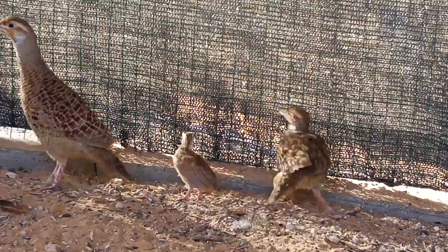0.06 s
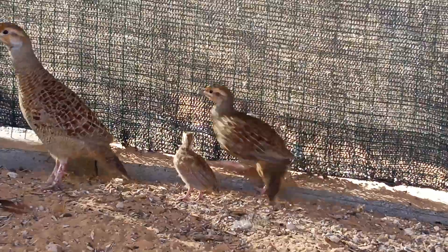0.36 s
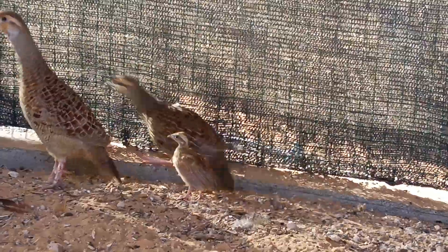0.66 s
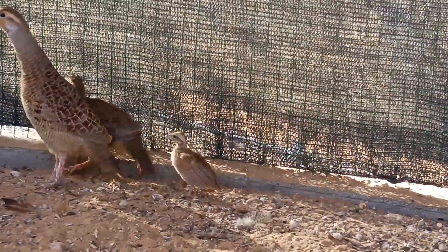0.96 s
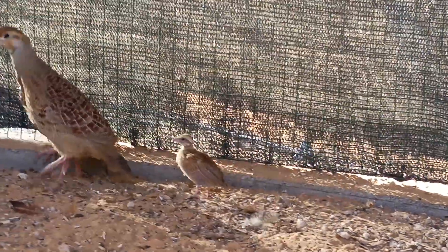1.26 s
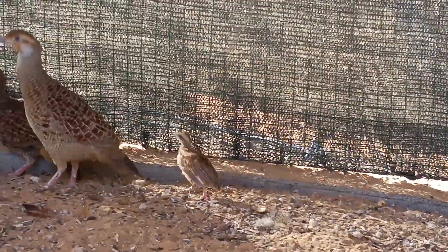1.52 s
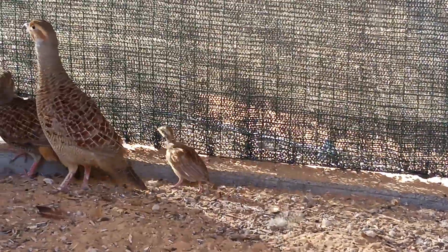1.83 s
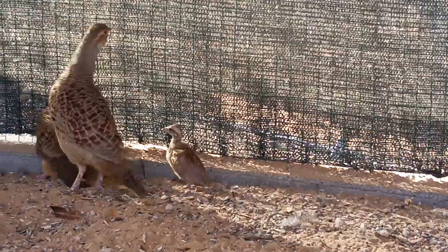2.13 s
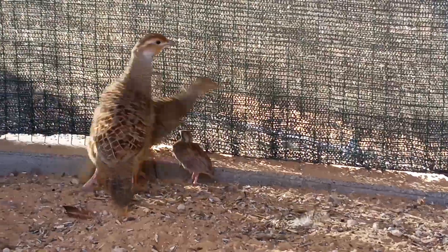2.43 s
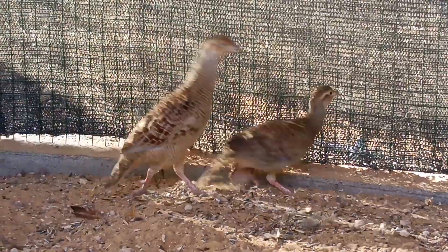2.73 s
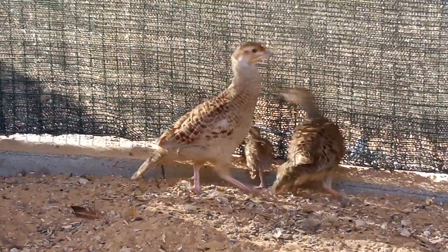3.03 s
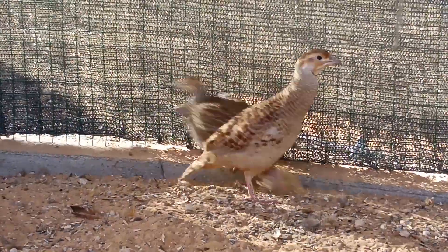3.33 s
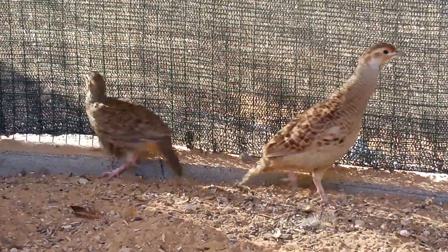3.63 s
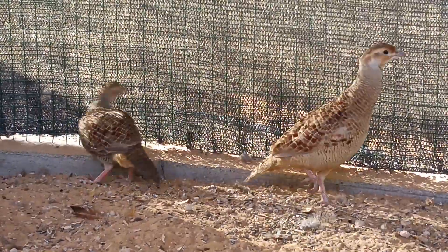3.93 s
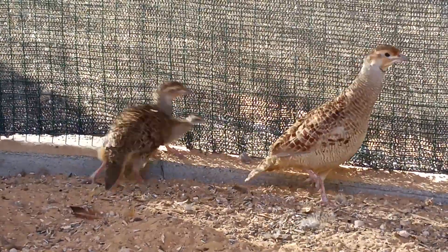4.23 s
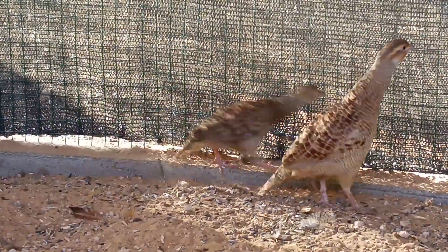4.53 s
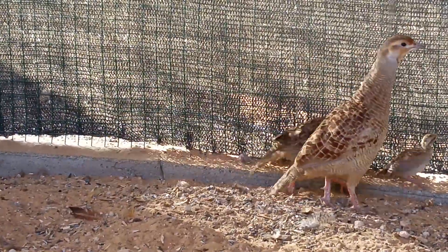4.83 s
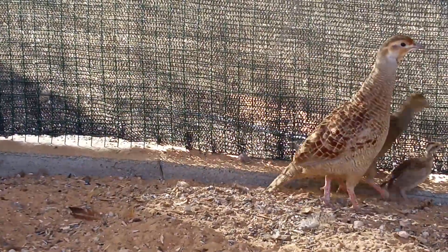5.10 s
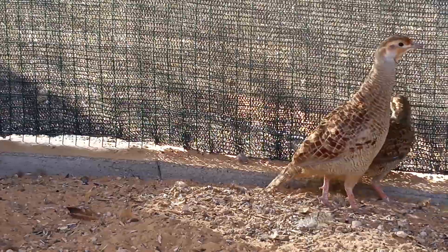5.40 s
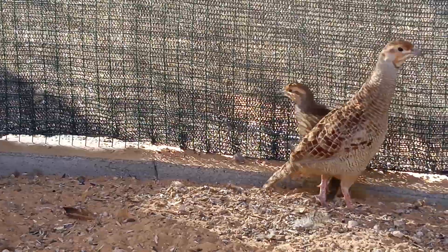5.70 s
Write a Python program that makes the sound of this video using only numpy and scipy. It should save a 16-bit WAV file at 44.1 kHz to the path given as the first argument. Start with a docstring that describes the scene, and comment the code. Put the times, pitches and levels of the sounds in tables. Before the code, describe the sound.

Young game birds peep softly close by while an adult cuts in four times with a loud, sharp chip that trails into a faint rattle. Hoarse little mutters and small gritty footsteps fill the gaps, and only faint peeps and steps follow the last call. Behind them in the open-air pen are a few very faint distant calls early on, a low hum that swells and fades, and a thin hiss.

```python
"""A netted pen, grey francolins walking on gravel. An adult gives four sharp calls, each a rising squeak,
a loud chip and a soft rasp fluttering through throat resonances; young birds peep, wheeze and chatter
in between, among soft low notes. Feet crack the grit, and ground and kerb echo briefly. Behind are
faint distant calls, a low hum that swells and fades, and quiet air."""
import sys
import numpy as np
from scipy import signal
from scipy.fft import rfft, irfft, next_fast_len
from scipy.io import wavfile

SR = 44100
rng = np.random.default_rng(int(sys.argv[2]) if len(sys.argv) > 2 else 0)


def store_wav(level_fs):
    """Save 16-bit WAV to argv[1]."""
    pcm = np.round(np.clip(np.atleast_2d(level_fs), -1, 1) * 32767)
    wavfile.write(sys.argv[1], SR, pcm.T.astype(np.int16))


N = 258323
TIME_S = np.arange(N) / SR
EDGE_HZ = 15900
PURE_OCTAVE_DB = -26  # re the fundamental
# Spectrum of hoarse breath. Each row: frequency in Hz, relative level in dB.
BREATH_SPECTRUM = [(1200, -48.5), (2000, -17.5), (3100, -2), (4200, -5), (5100, 0.5), (6300, -5),
                   (7500, -23), (12000, -32.5), (16000, -42)]


def adult(squeak_lead_s=.026, rattle_delay_s=.03, rattle_s=0.2781, left_db=3):
    """Each call: a squeak swells and sweeps up, breaks into a chip and trails off as a rattle."""
    # Each row: time in seconds, chip gain in dB, pitch in Hz, chip tone length in seconds,
    # third-harmonic gain in dB, rattle gain in dB.
    calls = [(.779, -13.5, 1770, 0.01702, -11, -42.5), (2.198, -14.5, 1702, 0.011, -19, -45),
             (3.184, -14.5, 1679, 0.014, -10, -43.5), (4.4626, -14, 1713, 0.01208, -13, -47)]
    out = np.zeros(N)
    for s, db, hz, length_s, third_db, rattle_db in calls:
        squeak = whistle(length_s=0.024, db=-39.5, path_hz=[1700, 2750, 3700], octave_db=0, rough=.55)
        add(out, s - squeak_lead_s, squeak * np.linspace(0, 2, len(squeak)))
        add(out, s - .004, chip(length_s, db, hz, third_db))
        add(out, s + rattle_delay_s, rattle(rattle_s, rattle_db))
    return panned(out, left_db)


def chip(length_s, db, hz, third_db, bend=.15, jitter=.028, puff_db=-3.5, puff_stretch=2.3, lead_s=.004):
    """A few dozen hard cycles whose pitch leaps and drops, inside a longer harsh puff."""
    # Each entry: relative level of a harmonic in dB, from the fundamental up.
    harmonics_db = [-10, -2, 0, -28.5, -34, -31, -29, -40.5]
    # Each row: frequency in Hz, relative level in dB.
    puff_spectrum = [(300, -47.5), (650, -34.5), (950, -28.5), (1650, 1), (2300, -4), (3100, 6.5),
                     (4200, -1), (5200, -2), (6200, -13.5), (8000, -26), (12000, -20), (16000, -33.5)]
    u, puff_u = progress(length_s), progress(length_s * puff_stretch)
    phase = phase_of(hz * (1 + bend * (arch(u, .6) - .94) + jitter * wobble(len(u), 700)))
    tone = sum(gain_of(level_db + third_db * (k == 3)) * np.sin(k * phase)
               for k, level_db in enumerate(harmonics_db, 1))
    out = gain_of(puff_db) * noise(len(puff_u), puff_spectrum) * arch(puff_u ** 0.7, 3.9)
    add(out, lead_s, evened(tone * arch(u, 1.6)))
    return gain_of(db) * out


def rattle(length_s, db, beat_hz=52, sag=.12, drift=0.04, swell_db=1.5, fall_db=9, push_db=5):
    """A fluttering throat rasp; with a last push of air the beak shuts and the resonances sink."""
    # Each row: centre in Hz, width in Hz, relative level in dB at the start and at the end.
    resonances = [(1516, 390, -23, 6), (2487, 380, 2, -6), (3289, 1200, 5.5, -0.5),
                  (4900, 660, -12.5, -25.5)]
    u = progress(length_s)
    shut = 1 - sag * np.clip(5 * u - 4, 0, 1)
    rasp = 0
    for hz, width_hz, start_db, end_db in resonances:
        centre_hz = hz * shut * (1 + drift * wobble(len(u), 7.3))
        rasp += gain_of(start_db + (end_db - start_db) * u ** 2) * band(centre_hz, width_hz)
    beat = np.cumsum(beat_hz * (1 + .15 * wobble(len(u), 30))) / SR % 1
    flutter = .27 + arch(beat ** .5, 4)  # one quick puff a beat
    last_push = np.exp(-((u - .78) / .13) ** 2)
    effort_db = swell_db * wobble(len(u), 10) - fall_db * u + push_db * last_push
    return gain_of(db) * evened(rasp * flutter * signal.windows.tukey(len(u), .45) * gain_of(effort_db))


def small_voices(gain_db=1, left_db=2):
    """Peeps, wheezes and chatter of the young birds, plus soft low notes."""
    # Each row: start in seconds, length in seconds, gain in dB, pitch in Hz, glide as a share of pitch.
    peeps = [(0.117, 0.0558, -60, 3278, -0.094), (0.342, 0.0205, -60, 3540, 0.015),
             (0.683, 0.0645, -44.5, 2144, 0.243), (0.717, 0.092, -36, 2480, .02),
             (1.279, 0.0775, -46, 2295, 0.093), (1.667, 0.0355, -41, 3358, -0.056),
             (1.683, 0.0537, -49.5, 3772, -0.244), (1.846, 0.166, -63, 3614, 0.062),
             (1.944, 0.0924, -62, 2049, 0.502), (2.035, 0.0496, -53, 2991, 0.367),
             (2.073, 0.0735, -54.5, 2565, -0.42), (2.232, 0.048, -38, 2211, -0.052),
             (2.288, 0.0359, -33.5, 2625, 0.076), (2.52, 0.0286, -43, 2580, -0.015),
             (2.542, 0.073, -38.5, 2357, 0.057), (2.593, 0.053, -42, 2610, 0.057),
             (2.714, 0.032, -39.5, 2507, .12), (2.793, 0.0474, -44, 3872, .14),
             (2.977, 0.0734, -44, 2585, 0.163), (3.527, 0.0667, -59.5, 3670, -0.092),
             (3.585, 0.069, -60.5, 2555, -.08), (5.167, 0.1397, -69, 3710, -.09),
             (5.382, 0.029, -64, 4060, -0.24), (5.679, 0.05, -64, 3107, 0.324),
             (5.744, 0.0586, -62.5, 3844, -0.273)]
    # Same columns. The row at 0.784 s is the low body of the adult's first chip.
    low_notes = [(0.653, 0.1212, -62.5, 587, -0.337), (0.784, 0.0276, -45, 937, 0.112),
                 (2.586, 0.165, -62, 386.1, -0.1026), (2.671, 0.0713, -61, 681.6, -0.164),
                 (3.264, 0.0295, -61.5, 337.7, 0.377), (3.546, 0.0704, -66.5, 701, 0.082),
                 (4.226, 0.0523, -66, 681.5, 0.036), (4.43, .019, -64, 544, 0.34),
                 (4.984, 0.1256, -70.5, 718, -.4), (5.302, 0.091, -77.5, 677.8, -0.19)]
    # Each row: start in seconds, length in seconds, gain in dB.
    wheezes = [(0.623, 0.0513, -40), (1.002, 0.0182, -44), (1.147, 0.0624, -51), (1.301, 0.0625, -49.5),
               (2.814, 0.02525, -49.5), (5.12, 0.03763, -56)]
    # Soft peeps are hoarser. Each row: peep gain in dB, roughness from 0 to 1.
    roughness = [(-60.5, .2), (-48.5, .21), (-40, .12)]
    out = np.zeros(N)
    for s, length_s, db, hz, glide in peeps:
        rough = np.interp(db, *np.transpose(roughness))
        add(out, s, note(length_s, db, hz, glide, throat_octave_db(db, hz), rough))
    for s, length_s, db, hz, glide in low_notes:
        add(out, s, note(length_s, db, hz, glide, PURE_OCTAVE_DB, rough=.14))
    for s, length_s, db in wheezes:
        add(out, s, wheeze(length_s, db))
    return gain_of(gain_db) * panned(out + chatter(), left_db)


def whistle(length_s, db, path_hz, octave_db, rough, jitter=.17, breath_db=-7):
    """A glide through three pitches; roughness shakes pitch and strength and lets breath through."""
    # Each entry: level of a harmonic in dB re the octave, from the third up.
    upper_db = [-17, -22.5, -17, -24]
    u, middle_hz = progress(length_s), path_hz[1]
    hz = np.polyval(np.polyfit([0, .5, 1], path_hz, 2), u)
    phase = phase_of(hz * (1 + jitter * rough * wobble(len(u), middle_hz / 5)))
    harmonics_db = [0, octave_db] + [octave_db + level_db for level_db in upper_db]
    tone = evened(sum(gain_of(level_db) * np.sin(k * phase)
                      for k, level_db in enumerate(harmonics_db, 1) if k * middle_hz < EDGE_HZ))
    breath = rough * gain_of(breath_db) * noise(len(u), BREATH_SPECTRUM)
    shake = 1 + rough * wobble(len(u), 260)
    return gain_of(db) * evened((tone * shake + breath) * arch(u ** .8, .8))


def note(length_s, db, hz, glide, octave_db, rough, bow=.03):
    """A whistle gliding through hz, both ends sagging by the share bow."""
    path_hz = [hz * (1 - bow - glide / 2), hz, hz * (1 - bow + glide / 2)]
    return whistle(length_s, db, path_hz, octave_db, rough)


def throat_octave_db(db, hz, nasal_db=8, throat_hz=5216, width_hz=280, throat_db=22.5):
    """A loud, low peep pushes its octave into the throat resonance; soft or high ones stay pure."""
    nasal = np.interp(db, (-54, -48), [0, 1]) * np.interp(hz, (2750, 3250), [1, 0])
    lift_db = throat_db * np.exp(-((2 * hz - throat_hz) / width_hz) ** 2)
    return PURE_OCTAVE_DB + (nasal_db + lift_db - PURE_OCTAVE_DB) * nasal


def wheeze(length_s, db):
    """A puff of hoarse air with a broken, falling voice in it."""
    u = progress(length_s)
    puff = evened(noise(len(u), BREATH_SPECTRUM) * arch(u, 1.4))
    voice = note(length_s, db=-6, hz=2250, glide=-0.077, octave_db=8, rough=.55)
    return gain_of(db) * evened(puff + voice)


def chatter(low_hz=3200, high_hz=5100, high_db=-2, waver=0.061, throb_db=3):
    """Soft hoarse mutter through two wandering throat resonances."""
    # Each row: time in seconds, gain in dB.
    envelope = [(1.4, -89), (1.6, -57), (2.15, -73.5), (2.32, -54), (2.86, -50), (2.96, -75), (3.7, -64.5),
                (3.95, -88)]
    throat = 1 + waver * wobble(N, 14)
    low = band(low_hz * throat, width_hz=1200)
    high = gain_of(high_db) * band(high_hz * throat, width_hz=1300)
    return follow(envelope) * evened((low + high) * gain_of(throb_db * wobble(N, 25)))


def feet(step_db=-10, grains_per_s=1100, crack_s=0.0039, scatter_s=0.017, scatter_db=-11):
    """Each step cracks a grain and scatters smaller ones; shuffling keeps up a fine crackle."""
    # Each row: start in seconds, gain in dB.
    steps = [(1.0288, -45), (1.094, -44.5), (1.5635, -33.5), (1.932, -46), (2.4487, -43), (3.391, -40.5),
             (3.5453, -43), (5.5075, -43), (5.758, -36), (5.8284, -43.5)]
    # Each row: frequency in Hz, relative level in dB.
    grit_spectrum = [(500, -19), (2000, -17), (4000, -3), (6500, 0), (8000, -3.5), (11000, 10),
                     (15500, -4.5)]
    # Each row: time in seconds, gain in dB.
    shuffle_envelope = [(1.45, -90), (1.62, -68.5), (2.1, -74.5), (2.7, -65.5), (4.2, -96.5)]
    out, t = np.zeros(N), np.arange(SR // 12) / SR
    for s, db in steps:
        scatter = gain_of(scatter_db + 8.1 * wobble(len(t), 250)) * np.exp(-t / scatter_s)
        grit = noise(len(t), grit_spectrum)
        add(out, s, gain_of(db + step_db) * grit * (np.exp(-t / crack_s) + scatter))
    grains = (rng.random(N) < grains_per_s / SR) * gain_of(3 * np.minimum(rng.exponential(1, N), 4))
    grain_decays = signal.lfilter([1], [1, -np.exp(-1 / 40)], grains)
    crackle = colour(grain_decays * rng.standard_normal(N), grit_spectrum)
    return panned(out + follow(shuffle_envelope) * crackle, left_db=4.1)


def pen(x, gap_s=.005, early_db=7, early_s=0.017):
    """Strong early echoes off ground and kerb, then a short diffuse tail, different at each ear."""
    # Each row: frequency in Hz, time to fall 60 dB in seconds.
    decay_times = [(200, 0.23), (1500, 0.23), (3500, 0.16), (5500, 0.22), (9000, 0.2), (15000, 0.23)]
    shape = (2, SR // 2)
    taps = rng.choice([-1., 1.], shape) * (rng.random(shape) < 1 / 12)
    taps[:, :int(gap_s * SR)] = 0
    hz, t, spectra = signal.stft(taps, SR, nperseg=256)
    fall_db = early_db * np.exp(-(t / early_s) ** 2) - 60 * t / at_hz(decay_times, hz)[:, None]
    tail = signal.istft(spectra * gain_of(fall_db), SR, nperseg=256)[1]
    return signal.fftconvolve(x, tail / np.linalg.norm(tail, axis=1)[:, None], axes=1)[:, :N]


def ports(x, lag_rad=1.389, knee_hz=800):
    """Two ports hear bass alike; in the treble the right one lags by a set angle and is shaded."""
    # Right port. Each row: frequency in Hz, gain in dB.
    shading = [(1000, -0.5), (1700, 2.5), (3400, -1.31), (5500, 1.5), (9000, -4)]
    hz = np.fft.rfftfreq(N, 1 / SR)
    right = gain_of(at_hz(shading, hz)) * np.exp(-1j * lag_rad * (1 - np.exp(-hz / knee_hz)))
    return np.array([x[0], irfft(rfft(x[1]) * right, N)])


def far_birds(hz=930, width_hz=220, throb_db=1.0):
    """Distant calls, each blurred to a wavering, throbbing band."""
    # Each row: start in seconds, length in seconds, gain in dB.
    calls = [(.25, 0.181, -70), (.95, 0.448, -64), (1.65, .55, -70.5)]
    envelope = np.zeros(N)
    for s, length_s, db in calls:
        add(envelope, s, gain_of(db) * arch(progress(length_s), 0.78))
    waver = 1 + .05 * wobble(N, 16)
    return envelope * band(hz * waver, width_hz) * gain_of(throb_db * wobble(N, 7))


def hum(hz=90.22, gain_db=-1, waver=0.028, octave_db=-24, rumble_hz=80., rumble_db=-10, edge_s=.016):
    """A low tone with a little rumble around it, in uneven swells."""
    # Each row: core start in seconds, core length in seconds, gain in dB.
    swells = [(0.279, 0.114, -54.5), (0.83, 0.179, -50), (1.214, 0.069, -54), (1.472, 0.122, -53.5),
              (1.699, 0.158, -50.5), (2.006, 0.139, -50.5), (2.266, 0.209, -50.5), (2.642, 0.3314, -49.5),
              (3.043, 0.089, -53.5), (3.305, 0.029, -56.5), (3.37, 0.063, -55), (3.583, 0.118, -54.5),
              (4.649, 0.0886, -53), (4.841, 0.139, -56), (5.406, 0.128, -51.5)]
    envelope = np.zeros(N)
    for s, length_s, db in swells:
        add(envelope, s - edge_s, gain_of(db) * arch(progress(length_s + 2 * edge_s), 0.344))
    phase = phase_of(hz * (1 + waver * wobble(N, 14)))
    tone = np.sin(phase) + gain_of(octave_db) * np.sin(2 * phase)
    rumble = gain_of(rumble_db) * band(np.full(N, rumble_hz), width_hz=75)
    return gain_of(gain_db) * envelope * evened(tone + rumble)


def air(wash_db=-67):
    """Quiet outdoor air and a thin hiss drifting in level."""
    # Each row: frequency in Hz, relative level in dB.
    wash_spectrum = [(25, -34), (50, -10), (100, 0.5), (180, -8.5), (320, -16), (700, -20), (1300, -29.5),
                     (2400, -21), (4500, -33.5), (10000, -25.5), (12000, -42.5), (16000, -56.5)]
    hiss_spectrum = [(1200, -4), (2400, 1.5), (5900, -11.5), (6600, 10.5), (7400, -8), (8200, 2.5),
                     (10400, 4), (11300, -15), (15000, -35)]
    # Each row: frequency in Hz, left-right correlation of the wash.
    correlation = [(50, 0.61), (200, 0.86), (600, 0.769), (2000, 0.058), (10000, 0.088)]
    # Each row: time in seconds, gain in dB.
    hiss_envelope = [(.2, -72.5), (1.4, -64), (1.65, -61), (2.7, -62), (3.4, -66.5), (5.8, -69.5)]
    same = at_hz(correlation, np.fft.rfftfreq(N, 1 / SR))
    left, other = rfft(rng.standard_normal((2, N)))
    right = same * left + np.sqrt(1 - same ** 2) * other
    wash = colour(irfft(np.array([left, right]), N), wash_spectrum)
    return gain_of(wash_db) * wash + follow(hiss_envelope) * noise((2, N), hiss_spectrum)


def gain_of(db):
    """Decibels to gain."""
    return 10 ** (np.asarray(db) / 20)


def evened(x):
    """Scales to rms 1."""
    return x / np.sqrt(np.mean(x ** 2) + 1e-20)


def at_hz(points, hz):
    """Interpolates rows of (Hz, value) on a log-frequency axis."""
    points_hz, values = np.transpose(points)
    return np.interp(np.log(hz + 1), np.log(points_hz + 1), values)


def follow(envelope):
    """Gain per sample from rows of (s, dB)."""
    return gain_of(np.interp(TIME_S, *np.transpose(envelope)))


def add(mix, s, sound):
    """Mixes a sound in at s seconds."""
    part = mix[..., max(round(s * SR), 0):][..., :sound.shape[-1]]
    part += sound[..., :part.shape[-1]]


def colour(x, spectrum):
    """Filters by rows of (Hz, dB), to rms 1."""
    size = next_fast_len(x.shape[-1])
    gains = gain_of(at_hz(spectrum, np.fft.rfftfreq(size, 1 / SR)))
    return evened(irfft(rfft(x, size) * gains, size)[..., :x.shape[-1]])


def noise(shape, spectrum):
    """Coloured noise, rms 1."""
    return colour(rng.standard_normal(shape), spectrum)


def wobble(size, cutoff_hz):
    """Smooth random drift, rms about 1."""
    padded = next_fast_len(size + SR // 8)
    hz = np.fft.rfftfreq(padded, 1 / SR)
    return evened(irfft(rfft(rng.standard_normal(padded)) / (1 + (hz / cutoff_hz) ** 4), padded))[:size]


def phase_of(hz):
    """Running phase in radians."""
    return 2 * np.pi * np.cumsum(hz) / SR


def band(hz, width_hz):
    """Noise in a resonance that follows the curve hz."""
    phase, size = phase_of(hz), len(hz)
    return evened(wobble(size, width_hz / 2) * np.cos(phase) + wobble(size, width_hz / 2) * np.sin(phase))


def progress(length_s):
    """Ramp from 0 to 1."""
    return np.linspace(0, 1, max(int(length_s * SR), 8))


def arch(u, power):
    """One swell and fade as u runs from 0 to 1."""
    return np.maximum(np.sin(np.pi * u), 0) ** power


def panned(x, left_db):
    """Stereo, left louder than right by left_db."""
    return x * gain_of([[left_db / 2], [-left_db / 2]])


def scene():
    """Birds and feet, direct and echoed, over hum and air; far birds come as echo only."""
    calls, voices, steps = gain_of(-4.5) * adult(), small_voices(), feet()
    direct = calls + gain_of(-4.5) * voices + steps
    echoes = pen(calls + gain_of(-0.5) * voices + gain_of(-7) * steps + far_birds())
    return ports(direct) + echoes + hum() + air()


def record(dry):
    """Fades in and limits the band."""
    fade = np.clip((TIME_S - .1) / 0.199, 0, 1)
    lowpass = signal.firwin(511, EDGE_HZ, window=("kaiser", 9), fs=SR)
    return signal.oaconvolve(dry * fade, lowpass[None], "same")


dry = scene()
out = record(dry)
store_wav(out)
```